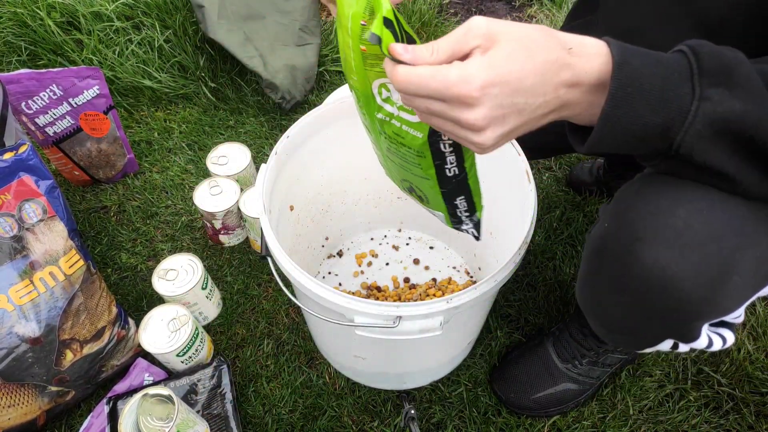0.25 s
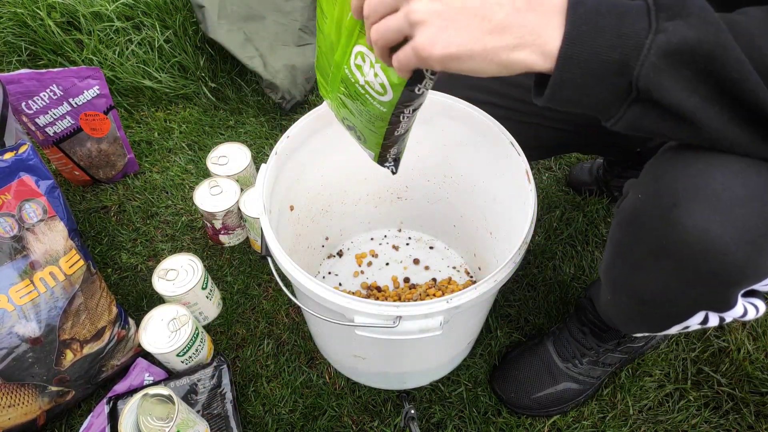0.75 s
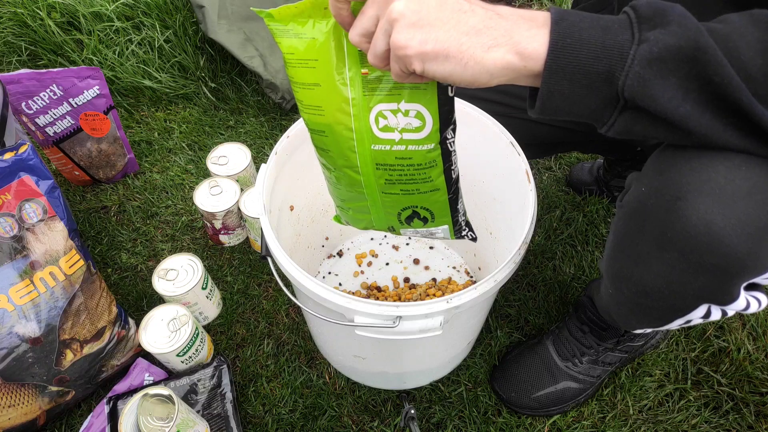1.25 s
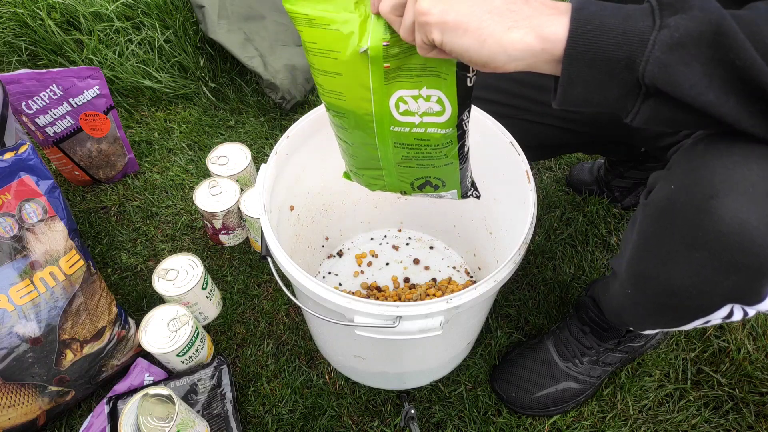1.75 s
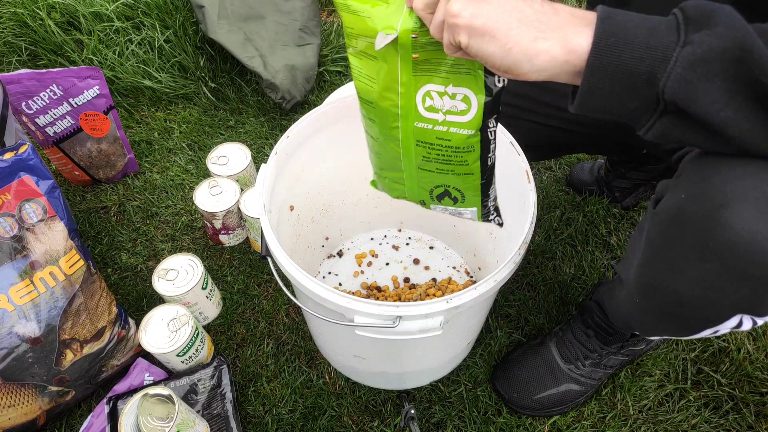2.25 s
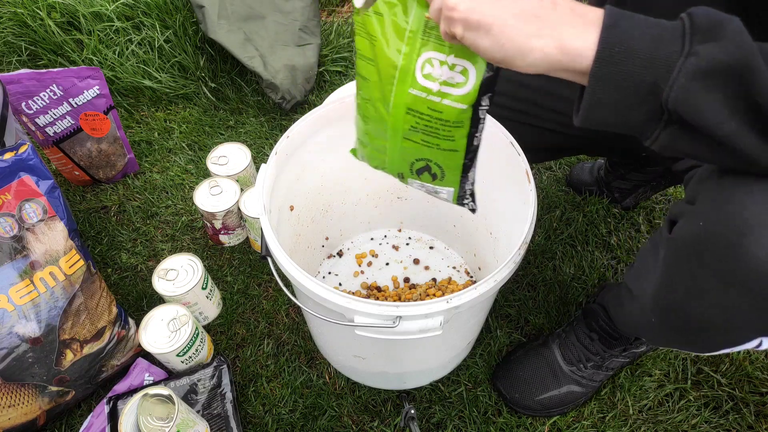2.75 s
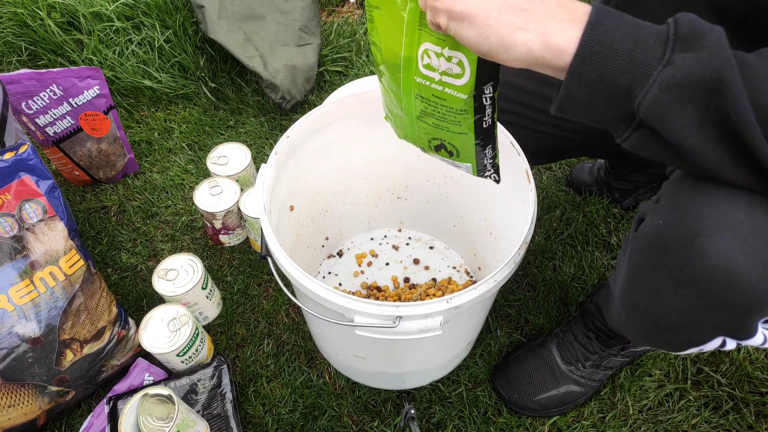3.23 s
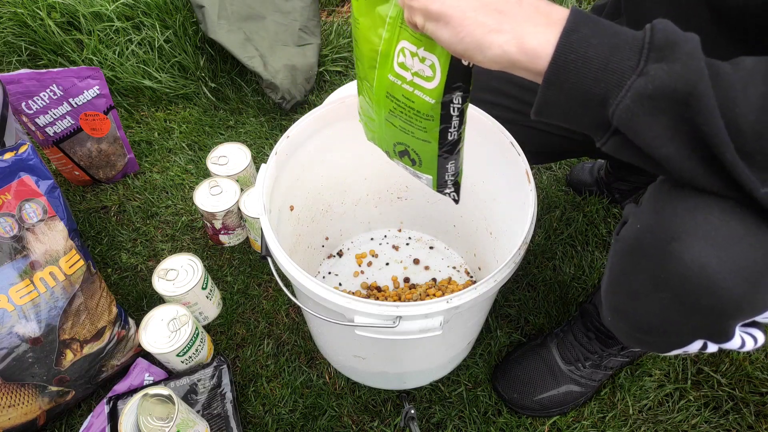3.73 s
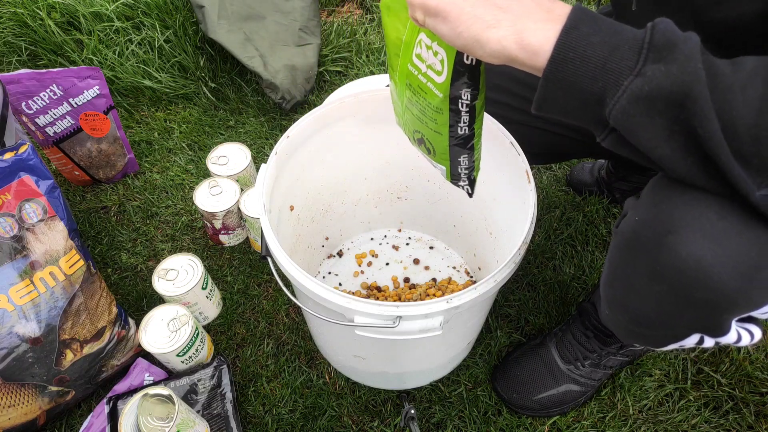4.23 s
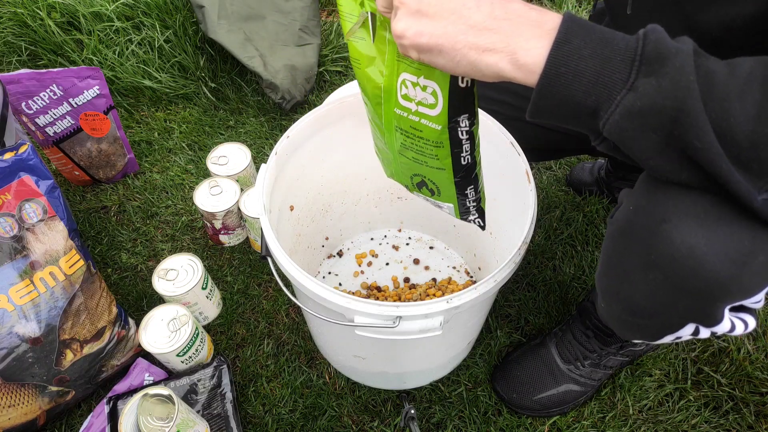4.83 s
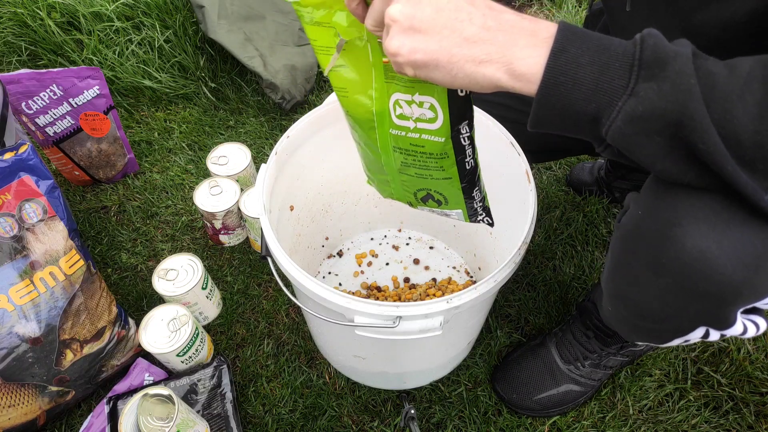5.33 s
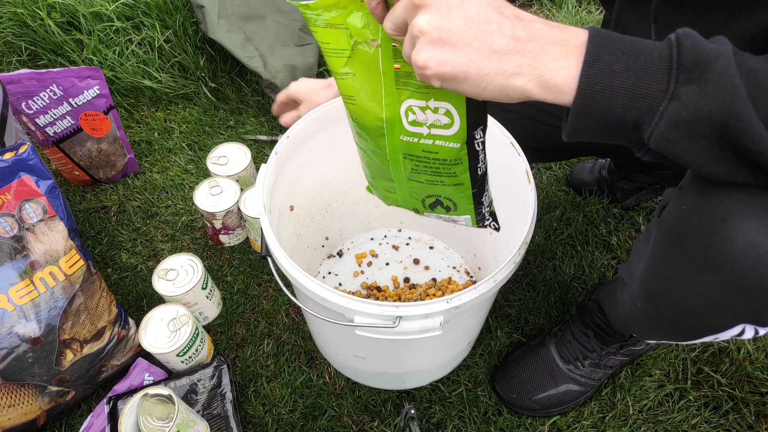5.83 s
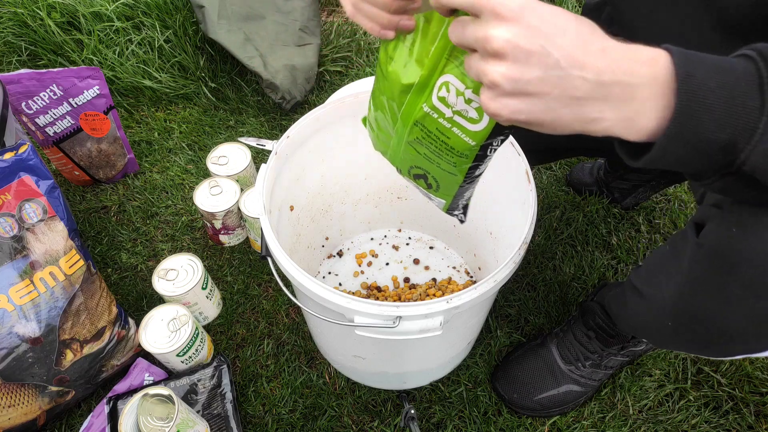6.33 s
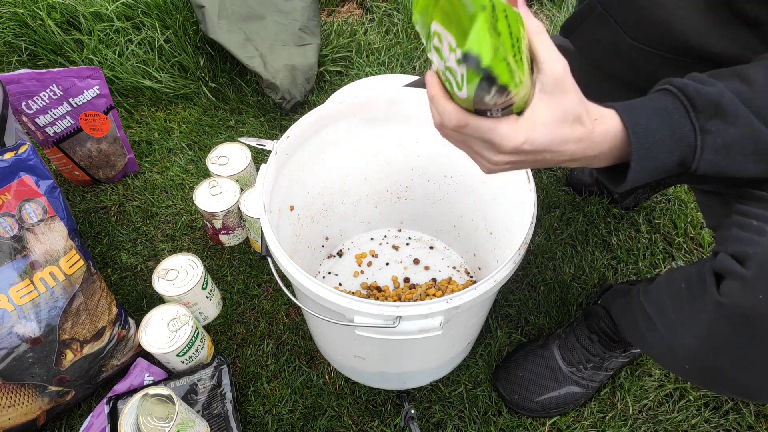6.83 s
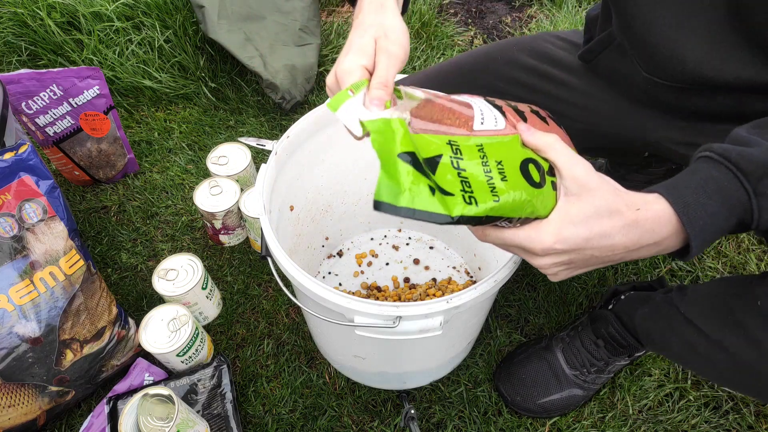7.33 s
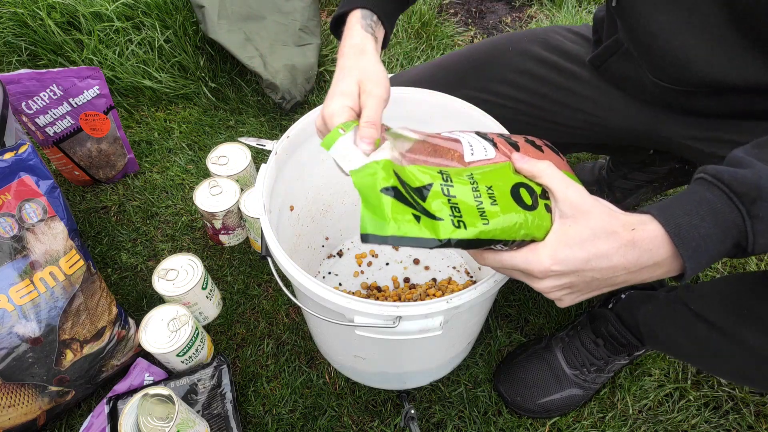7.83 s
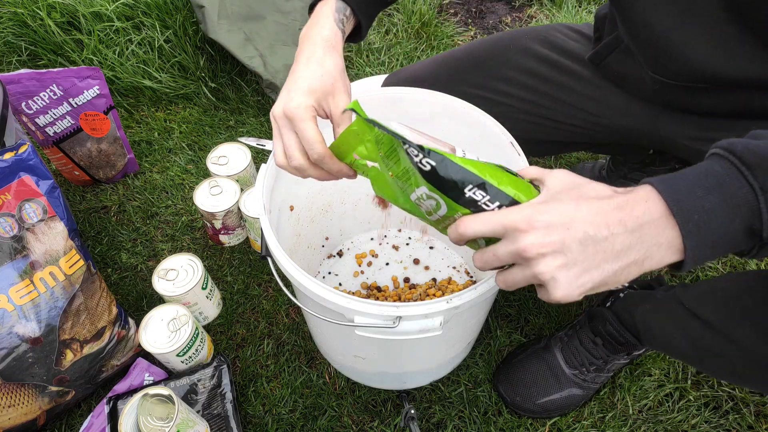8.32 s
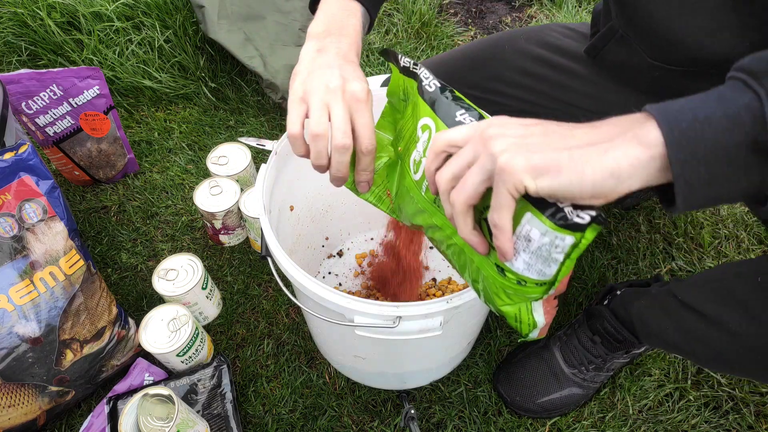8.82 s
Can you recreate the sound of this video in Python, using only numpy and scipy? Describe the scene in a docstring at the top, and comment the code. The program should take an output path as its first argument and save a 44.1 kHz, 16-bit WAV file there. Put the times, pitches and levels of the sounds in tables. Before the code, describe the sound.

Outdoors, close to the microphone, a stiff plastic bag of dry bait is handled over a plastic bucket. From 0.25 to 1 s it crackles densely with sharp snaps and small ringing pops. Lighter crinkling follows, then the strongest shakes come around 1.7-2.8 s, with hard cracks and low, soft thuds as the contents slump. From 3 to 5.3 s the crackle is quieter and more scattered, with muffled seed rattles. A near pause follows; at 5.9 s a tick makes the bucket ring briefly, followed by soft nudges. Small birds buzz and whistle from about 5.4 s, then trill and twitter, off to the right, until about 8 s. Film rustling resumes at 6.2 s. Crumbs slide audibly around 7 s and again from 8 s, ending in a fine, fizzy trickle to 9 s. Faint air and a swelling distant rumble continue throughout.

```python
"""A stiff plastic bag of dry groundbait is shaken down, opened and tipped over a plastic bucket, on grass outdoors.
The film makes single snaps, ringing pops and dense crackle, built from short pulses with noisy tails.
Bait slumps as bursts of low noise; something knocks the bucket in a pause, a tick with ringing tones.
Near the end fine crumbs pour as thousands of tiny clicks.
Small birds twitter in gliding whistles over the filtered noise of open air and a far rumble."""
import sys
import numpy as np
from scipy import signal
from scipy.fft import rfft, irfft, next_fast_len
from scipy.io import wavfile
from scipy.ndimage import uniform_filter1d

SR = 44100
rng = np.random.default_rng(int(sys.argv[2]) if len(sys.argv) > 2 else 0)


def unload_wav(signal):
    """Save mono or channel-first audio to the path in sys.argv[1] as 16-bit WAV at rate SR, clipped to [-1, 1]."""
    wavfile.write(
        sys.argv[1],
        SR,
        np.round(np.clip(np.atleast_2d(signal).T, -1, 1) * 32767).astype(np.int16),
    )


N = 399987
TIME = np.arange(N) / SR
TOP_HZ = 16000  # upper edge of the whole sound


def undb(db):
    """Turn decibels into a gain."""
    return 10 ** (np.asarray(db) / 20)


def unit(x):
    """Scale to an rms of 1."""
    return x / np.sqrt(np.mean(x ** 2) + 1e-20)


def fade(t, t60):
    """Die away by 60 dB in t60 seconds."""
    return np.exp(-np.log(1000) * t / t60)


def stereo_noise(size):
    """Two unrelated channels of white noise."""
    return rng.standard_normal((2, size))


def curves(table):
    """Read each column of a timed table, sample by sample."""
    s, *columns = np.transpose(table)
    return [np.interp(TIME, s, c) for c in columns]


def add(out, s, sound):
    """Mix a sound in at time s."""
    i = max(int(s * SR), 0)
    out[:, i:i + sound.shape[-1]] += sound[..., :max(N - i, 0)]


def walk(rate):
    """Slow chance: random levels, rate per second, joined by straight lines, with a spread near 1."""
    points = rng.standard_normal(4096)
    return 1.434 * np.interp(TIME * rate, np.arange(len(points)), points)


def response(points, size=2048):
    """Make a filter from an (f/Hz, level/dB) spectrum that never sounds ahead of its input."""
    hz, db = np.transpose(points)
    f = np.maximum(np.fft.rfftfreq(size, 1 / SR), 1)
    level_db = np.interp(np.log(f), np.log(hz), db)
    # folding the cepstrum forward gives minimum phase
    cepstrum = irfft(np.log(undb(level_db)))
    cepstrum[1:size // 2] *= 2
    cepstrum[size // 2 + 1:] = 0
    return irfft(np.exp(rfft(cepstrum)))


def colour(x, points, size=2048):
    """Filter a stereo sound with an (f/Hz, level/dB) spectrum."""
    return signal.fftconvolve(x, response(points, size=size)[None], axes=1)[:, :x.shape[1]]


def band(x, hz, kind, order=2):
    """Keep one range of frequencies (Butterworth filter)."""
    return signal.sosfilt(signal.butter(order, hz, kind, fs=SR, output="sos"), x)


def spread(pair, apart_hz, bass_side=0.16):
    """Make left and right nearly alike in the bass and unrelated in the treble, as in a wide sound."""
    mid, side = pair
    size = next_fast_len(len(side), True)
    treble = (np.fft.rfftfreq(size, 1 / SR) / apart_hz) ** 4
    side_gain = np.sqrt((bass_side ** 2 + treble) / (1 + treble))
    side = irfft(rfft(side, size) * side_gain, size)[:len(mid)]
    return np.array([mid + side, mid - side])


def registers(x, body_hz=700, crisp_hz=2500):
    """Split a film sound into dull body, middle and crisp top."""
    body = band(x, body_hz, "low", order=4)
    middle = band(x, [body_hz, crisp_hz], "band", order=3)
    top = band(x, crisp_hz, "high", order=3)
    return [body, middle, top]


# colour of the open air: f/Hz, level/dB
AIR_COLOUR = [(20, -1.5), (38, -9.5), (54, -3), (72, -2), (120, -8), (230, -21), (330, -16.5), (480, -16.5),
              (800, -25.5), (1600, -31), (4500, -32), (7400, -38), (8700, -44), (14200, -39), (16000, -95)]
# a far rumble that swells and sinks: t/s, level/dB (it wavers around this)
RUMBLE_LEVEL = [(0, -59.5), (1.2, -54), (3.0, -49.5), (3.44, -51.5), (3.48, -50), (3.54, -55), (4.2, -56.5),
                (4.8, -52.5), (5.3, -49), (5.8, -56), (6.6, -57), (7.1, -50.5), (7.6, -46), (7.75, -48.5),
                (7.95, -47), (8.2, -53), (8.6, -57), (8.83, -46), (9.07, -60)]
# colour of the rumble: f/Hz, level/dB
RUMBLE_COLOUR = [(90, -29.5), (150, -5.5), (205, 1), (260, -5.5), (330, -18.5), (450, -11.5), (800, -53.5)]


def outdoors(air_db=-53.5, breeze_db=-61, hum_db=-60, hum_hz=54, hum_drift_hz=2, waver_db=1.5):
    """Open air, a light breeze and a far rumble are filtered noise; a faint low hum is a drifting tone."""
    air = unit(colour(spread(stereo_noise(N), apart_hz=2120, bass_side=0.69), AIR_COLOUR, size=8192))
    breeze = unit(band(stereo_noise(N), 44, "low"))
    hum_phase = 2 * np.pi * np.cumsum(hum_hz + hum_drift_hz * walk(6.7)) / SR
    hum = unit(np.sin(hum_phase) * undb(2 * walk(2.4)))
    rumble = unit(colour(spread(stereo_noise(N), apart_hz=2520, bass_side=0.12), RUMBLE_COLOUR))
    rumble_db = curves(RUMBLE_LEVEL)[0] + waver_db * walk(8.1)
    return undb(air_db) * air + undb(breeze_db) * breeze + undb(hum_db) * hum + undb(rumble_db) * rumble


# colour of one buckle of the film: f/Hz, level/dB
FILM_COLOUR = [(60, -23), (150, -22.5), (270, 0.5), (390, 2), (500, -3.5), (750, -4), (1100, -1.5),
               (2000, -1.5), (3200, -0.5), (7300, 2.5), (8600, -10), (14200, -14), (16000, -51)]


def buckle(flutter_db, flutter_t60, facet_db, uneven_db=4.0, sides_db=3, lowest_hz=850,
           facet_octaves=3.24, echo_db=-14.02, echo_t60=0.034, echo_hz=1800, size=2048):
    """One facet of film flips: a sharp pulse with its own pitch, a flutter and dull echoes in the bucket."""
    t = np.arange(size) / SR
    hz = np.geomspace(200, 16000, 22)
    # broad facets pop low, tiny ones tick high
    octaves_off = np.log2(hz / lowest_hz) - facet_octaves * rng.random()
    facet = facet_db * np.exp(-octaves_off ** 2) + uneven_db * rng.standard_normal(len(hz))
    # samples between left and right; every crease lies elsewhere
    lag = 1.84 + 1.53 * rng.standard_normal()
    pulse = np.array([np.sinc(np.arange(size) - 10 - d) for d in (lag / 2, -lag / 2)])
    flutter = unit(spread(stereo_noise(size), apart_hz=3400) * fade(t, flutter_t60))
    echoes = spread(stereo_noise(size), apart_hz=3400) * fade(t, echo_t60)
    echoes = unit(band(echoes, echo_hz, "low"))
    # dividing by sqrt(size) sets each tail's energy against that of the pulse
    flip = pulse + (undb(flutter_db) * flutter + undb(echo_db) * echoes) / np.sqrt(size)
    # short waves beam, so each side hears its own treble
    beams = sides_db * rng.standard_normal((2, len(hz))) * np.minimum(hz / 4000, 1)
    own = [np.convolve(f, response(np.c_[hz, facet + b], size=256))[:size] for f, b in zip(flip, beams)]
    return colour(np.array(own), FILM_COLOUR)


def swarm(rate, sizes, facets):
    """Scatter buckles at random moments; rate is buckles per second, one number or one per sample."""
    out = np.zeros((2, N))
    which = rng.integers(0, len(facets), N)
    for i in np.flatnonzero(rng.random(N) < rate / SR):
        add(out, i / SR, sizes[i] * facets[which[i]])
    return out


# light crackle of the bag as it hangs in the hands: t/s, level/dB
HOLDING = [(0, -73), (.24, -81), (.27, -50.5), (1.1, -55), (1.22, -60), (1.48, -66.5), (1.56, -48),
           (2.9, -53.5), (3.45, -52), (3.62, -58.5), (3.92, -60), (4.3, -52.5), (4.75, -54.5), (5.33, -50),
           (5.48, -71.5), (6.16, -105), (6.2, -53), (6.56, -52), (6.63, -69), (6.95, -50.5), (7.5, -57.5),
           (7.7, -61), (7.86, -63.5), (7.96, -53), (8.15, -55.5), (8.55, -56), (9.07, -58.5)]
# each shake or squeeze sets off a burst of crackle:
# t/s, length/s, level/dB (at its end), crisp top/dB (against the middle)
SQUEEZES = [(0.25, 0.1, -42, -6), (0.428, 0.058, -36, 2), (0.689, 0.07, -34.5, 1),
            (0.828, 0.074, -38.5, -11), (0.909, 0.087, -36, 2.5), (1.013, 0.079, -41.5, -1.5),
            (1.555, 0.027, -37.5, -6), (1.7, 0.081, -43.5, -4), (1.819, 0.049, -43, -10),
            (1.955, 0.062, -42, -2), (2.082, 0.13, -39.5, -5.5), (2.27, 0.19, -39, -5),
            (2.367, 0.035, -25.5, -1.5), (2.43, 0.031, -32.5, -0.5), (2.453, 0.049, -30.5, 3),
            (2.504, 0.152, -38.5, -4), (2.679, 0.089, -32.5, 1.5), (2.774, .1, -40.5, -3),
            (2.943, 0.12, -44.5, -6), (3.105, 0.035, -43, -6), (3.21, 0.11, -45.5, -7),
            (3.354, 0.059, -41.5, -2), (3.726, 0.096, -44.5, -4), (4.176, 0.05, -52.5, 9.5),
            (4.4, 0.035, -42.5, 0.5), (4.491, 0.017, -42.5, 2), (4.677, 0.15, -45.5, -4),
            (4.808, 0.1, -47.5, -2), (5.106, 0.023, -40.5, -2), (5.165, 0.026, -41.5, -1.5),
            (5.251, 0.038, -37, -1.5), (6.19, 0.034, -46, 2), (6.216, 0.029, -37, -2),
            (6.27, 0.048, -46, 1), (6.401, 0.044, -46, -5), (6.506, 0.077, -42, -2),
            (6.994, 0.04, -41.5, -0.5), (7.091, 0.1, -53.5, -4), (7.447, 0.05, -48.5, 3),
            (7.971, 0.091, -50, 1), (8.076, 0.03, -40.5, -7), (8.74, 0.078, -48.5, -1)]


def effort(attack_s=.009, release_s=.018, ease_db=3):
    """How hard the film is worked and how crisp it sounds (dB): squeezes rise, ease and let go."""
    middle = undb(curves(HOLDING)[0]) ** 2
    top = middle.copy()
    for s, length, db, crisp in SQUEEZES:
        on = slice(int(s * SR), int((s + length + 10 * release_s) * SR))
        t = np.arange(len(TIME[on])) / SR
        shape = (1 - np.exp(-t / attack_s)) * np.exp(-np.maximum(t - length, 0) / release_s)
        # the target level starts ease_db higher and sinks during the squeeze
        burst = shape * undb(db + ease_db * (1 - np.minimum(t / length, 1)))
        middle[on] += burst ** 2
        top[on] += (burst * undb(crisp)) ** 2
    return 10 * np.log10(middle), 10 * np.log10(top / middle)


def crackle(rate=190, rate_per_db=0.08, size_db=5.0, rub_db=-26, body_db=-4, count=60):
    """Swarms of small buckles, denser under a harder grip, over the hiss of bait rubbing along the film."""
    db, crisp = effort()
    per_second = rate * np.exp(rate_per_db * (db - np.median(db)))
    sizes = undb(size_db * np.minimum(rng.exponential(size=N), 4)) * rng.choice([-1, 1], N)
    facets = [unit(buckle(flutter_db=5, flutter_t60=0.037, facet_db=11.5)) for _ in range(count)]
    rub = unit(colour(spread(stereo_noise(N), apart_hz=3280), FILM_COLOUR))
    film = unit(swarm(per_second, sizes, facets)) + undb(rub_db) * rub
    heard = 0
    for part, level in zip(registers(film), (db + body_db, db, db + crisp)):
        # the hands' work is shared out among the creases that give way at that moment
        power = uniform_filter1d(np.mean(part ** 2, axis=0), size=2200)
        heard = heard + part * undb(level) / np.sqrt(np.maximum(power, 1e-9))
    return heard


def rattle(rate=110, under_hold_db=-6, size_db=3.5, muffle_hz=2100, count=16):
    """Seeds shift inside the hanging bag and tap the film: a swarm of soft, low, muffled pops."""
    sizes = undb(size_db * np.minimum(rng.exponential(size=N), 3))
    taps = [unit(buckle(flutter_db=0, flutter_t60=0.02, facet_db=22, lowest_hz=650, facet_octaves=1.4))
            for _ in range(count)]
    muffled = unit(band(swarm(rate, sizes, taps), muffle_hz, "low"))
    return muffled * undb(curves(HOLDING)[0] + under_hold_db)


def crease(pop_hz, flutter_db=1.0, slack_db=3, slip_db=-9, slip_s=.007):
    """A crease gives way, taut or slack, and slips once more a moment later with its sides swapped."""
    first = buckle(flutter_db=flutter_db + slack_db * rng.standard_normal(), flutter_t60=0.017,
                   facet_db=7.0, uneven_db=3.0, lowest_hz=pop_hz, facet_octaves=0)
    lag = int(SR * slip_s * (.2 + rng.random()))
    return first + undb(slip_db) * np.roll(first[::-1], lag, axis=1)


# the loudest creases that buckle singly:
# t/s, level/dB (of the middle), crisp top/dB (against the middle), left minus right/dB (of the top)
SNAPS = [(.262, -33, -1.5, 4), (.282, -35, -2.5, 0), (.294, -41, 9, 2), (0.312, -39, 9.5, -4),
         (0.344, -42.5, 9.5, -2), (0.369, -33, -3, -2.5), (.407, -48, 10, -1), (.418, -34, -1.5, 1),
         (.449, -39.5, 9.5, -3), (0.5239, -40, 9.5, 1), (0.5554, -34.5, 0, -2), (0.61, -30.5, 1, 1),
         (0.6205, -33.5, -0.5, -13), (.637, -43, 8, -3), (0.6756, -30.5, 1.5, -1), (0.685, -29, -1.5, -3),
         (.719, -25.5, -10, -2), (0.8124, -33, -3.5, 3), (.837, -33, -6, -1), (0.859, -34.5, 6.5, -1),
         (.882, -35.5, 2, -10), (0.889, -35, 2, 5), (.919, -29.5, -3, -4), (.953, -36, 6.5, 1),
         (0.968, -39.5, 12, -1), (0.9786, -37, 0, -2), (.991, -37.5, 9.5, 0), (1.013, -28, -1, 1),
         (1.126, -39.5, -12, -1), (1.1693, -36, -11.5, -4), (1.268, -40.5, -21, -4),
         (1.2796, -38.5, -10, 1), (1.4082, -38.5, -14, -4), (1.433, -44, -11, 0), (1.5102, -45, 1.5, 0),
         (1.523, -35.5, -7, -1), (1.5469, -32, 7, -1), (1.554, -33.5, 5, 0), (1.6145, -48, 3, -7),
         (1.6227, -38, 1, -2), (1.698, -34.5, -1.5, 2), (1.7233, -36, 0.5, 24.5), (1.7302, -27, -2.5, -11),
         (1.759, -19, -4.5, 3), (1.7709, -23.5, -1.5, -2), (1.781, -34, -2, 0), (1.8002, -24, -2.5, -1),
         (1.8048, -45, 7.5, -7), (1.845, -41, 5.5, -2), (1.9098, -30, 0, 0), (1.95, -37, -9, -4.5),
         (2.0417, -46, 4, 1), (2.087, -32.5, 1.5, 0), (2.127, -36.5, 9, 0), (2.143, -32, -3, -2),
         (2.1689, -24.5, -3, 0), (2.1906, -34.5, 7.5, 0.5), (2.243, -37, -0.5, 1), (2.291, -33, -3, -2),
         (2.314, -41, -3, -3), (2.34, -36, -4, 0), (2.407, -22.5, 1.5, -3), (2.461, -23.5, -1, 4.5),
         (2.4951, -32, 8, 0), (2.523, -33, -2, 0), (2.543, -34, -1, 0), (2.6189, -31.5, -2.5, 0),
         (2.6748, -22.5, -2.5, 0.5), (2.7063, -29.5, 9.5, 0.5), (2.731, -38, 12, 0), (2.759, -33.5, 9.5, 0),
         (2.803, -38.5, 8.5, -1), (2.989, -37, -2.5, -1), (3.012, -39.5, 6.5, 2), (3.049, -38, 4.5, -2),
         (3.09, -44, 7, -2), (3.177, -40.5, -2, -5), (3.227, -39, -7, -1), (3.291, -45.5, 7, -4),
         (3.3718, -33.5, 2.5, -1), (3.395, -37, -7, -4), (3.5137, -29.5, 4.5, -5.5), (3.603, -52, 4, -4),
         (3.644, -41.5, -8.5, -4), (3.71, -39, -2, -4), (3.7498, -40.5, 2, -1), (3.792, -46, 9.5, 0),
         (3.807, -36, 1, 0), (3.8429, -40, 4.5, -1), (3.959, -46, 2, -1), (3.969, -41.5, -15, 1),
         (3.98, -45, 5.5, -12), (4.0318, -36.5, -8, -1), (4.065, -47.5, 3.5, -2), (4.1086, -37.5, -5, 2),
         (4.187, -44.5, 1, 2), (4.221, -37.5, 0.5, -2), (4.231, -34.5, -12, -2), (4.245, -43, -6, 0),
         (4.288, -42.5, 5.5, -1), (4.321, -43.5, -9, 0), (4.424, -44, 4, -5), (4.434, -52, 8, 4),
         (4.46, -37, -4.5, -3), (4.5006, -41, -0.5, -3), (4.508, -57, 12, -3), (4.5699, -38.5, 8.5, -2),
         (4.5982, -34, 1, -2), (4.653, -48.5, 2, 1), (4.685, -36, 1.5, -2.5), (4.71, -35, 0.5, -4),
         (4.7575, -34, 0.5, -3), (4.773, -42, -8, -1), (4.822, -36.5, 0, -5), (4.89, -38.5, -14, -2),
         (4.904, -48, 3, -2), (4.996, -39, -24, -4), (5.027, -32.5, -5, 0), (5.1, -32, 1.5, -4),
         (5.1323, -43.5, 15, -1), (5.186, -46, -11, 2), (5.204, -34.5, 1.5, -2), (5.268, -51, 11.5, -2),
         (5.289, -29.5, 0, -3), (5.302, -36, 3.5, 3), (5.444, -44.5, 0.5, 0), (6.225, -32.5, 1.5, -3),
         (6.243, -36, 7.5, 2), (6.286, -53, 18, -4), (6.304, -30, -1, -8), (6.373, -48, -10, -1),
         (6.5327, -30.5, 1.5, -3.5), (6.561, -45.5, 9, -5), (6.604, -49, 7, 5), (6.644, -39.5, 2, -5),
         (6.9, -44.5, 3, -4), (6.923, -45.5, 0, 5), (6.931, -39.5, -2, -2), (7.004, -40.5, 6, -2),
         (7.013, -41, -2, 0), (7.021, -44, -2, 0), (7.0505, -40, 0.5, 3), (7.153, -40, 7.5, 0),
         (7.2337, -36, -1, 2), (7.239, -39, 6, 2), (7.325, -45, 8, 1), (7.417, -44.5, 5.5, 0),
         (7.44, -38.5, 0, -2), (7.4692, -34, -1, -2), (7.492, -42.5, 6, 0), (7.598, -33.5, 7, -1),
         (7.609, -36, 5, 14), (7.6418, -36, 4, 4), (7.6723, -43, 1, -1), (7.7877, -48, 8.5, 2),
         (7.9615, -27.5, 5, 2), (8.0471, -42, 1, 5), (8.085, -47.5, 8, 7), (8.095, -42.5, 12.5, -2),
         (8.111, -37, 2, 3), (8.1532, -44.5, 7.5, 0), (8.179, -45.5, 6, -1), (8.225, -39, 3.5, 0),
         (8.244, -52, 6, 3), (8.378, -36, -9, -2), (8.4466, -46, -4, 0), (8.501, -48, 0, -1),
         (8.523, -47, 1, 0), (8.599, -45.5, 4.5, 1), (8.639, -42, -6, -1), (8.693, -46.5, -5, -6),
         (8.754, -31, 1.5, 4.5), (8.7587, -39.5, 8.5, -5), (8.8162, -44, -2, -2), (8.839, -40, 5.5, .5),
         (8.9159, -38.5, -2.5, -8)]


def snaps(middle_pop_hz=1470, crisp_db_per_octave=3.5, body_db=-14, body_lean=0.51, middle_lean=0.26):
    """Loud single buckles: the crisper a snap, the smaller its facet and the higher it pops."""
    out = np.zeros((2, N))
    span = .008 * SR  # a level counts all the energy as if it fell within 8 ms
    for s, db, crisp, pan in SNAPS:
        pop_hz = middle_pop_hz * 2 ** (crisp / crisp_db_per_octave)
        parts = registers(crease(pop_hz))
        levels = (db + body_db, db, db + crisp)
        # body and middle lean less to one side than the top
        for part, level, lean in zip(parts, levels, (body_lean, middle_lean, 1)):
            gain = undb(level + lean * np.array([[pan], [-pan]]) / 2)
            even = part * np.sqrt(span / np.sum(part ** 2, axis=1, keepdims=True))
            add(out, s - .0003, gain * even)
    return out


# the bait slumps against the bag: t/s, level/dB (rms of the first 15 ms), decay t60/s
SLUMPS = [(0.446, -35, 0.059), (0.718, -38, 0.078), (1.012, -41, 0.035), (1.727, -21.5, 0.049),
          (1.758, -29.5, 0.11), (2.169, -32, 0.045), (2.377, -23.5, 0.11), (2.401, -22, 0.042),
          (2.482, -34.5, 0.31), (2.71, -30.5, 0.12), (3.513, -33, 0.025), (5.301, -33.5, 0.027)]
# colour of a slump: f/Hz, level/dB
SLUMP_COLOUR = [(55, -12), (90, -1.5), (140, 2), (200, -1.5), (370, 8), (520, -1.5), (800, 1.5), (1200, 2),
                (2000, -29)]


def slumps(size=8192):
    """The mass of bait drops into a corner of the bag: a soft, low thud of fading noise."""
    out, t = np.zeros((2, N)), np.arange(size) / SR
    for s, db, t60 in SLUMPS:
        grains = spread(stereo_noise(size), apart_hz=4000)
        thud = colour(grains * fade(t, t60), SLUMP_COLOUR)
        add(out, s, undb(db) * thud / np.sqrt(np.mean(thud[:, t < .015] ** 2)))
    return out


# a taut panel of the bag pops over and rings for a few cycles:
# t/s, pitch f/Hz, level/dB (of the ring), t60/s, crease tick/dB (against the ring)
POPS = [(.741, 1960, -27.5, .02, -10), (1.035, 1270, -31.5, .022, -6), (1.063, 1390, -30.5, .018, -4),
        (1.675, 870, -36.5, .02, -12), (1.7095, 890, -35, .012, -11.5), (1.7277, 780, -18.5, .011, -9),
        (2.479, 1040, -22, .005, -10), (2.8185, 2060, -39, .016, -9), (2.8546, 1770, -30.5, .014, -11),
        (2.968, 1120, -36.5, .02, -5), (3.5586, 800, -37.5, .016, -2), (3.997, 950, -39.5, .02, -3.5),
        (4.853, 980, -42, .018, -9), (6.336, 2030, -34, .02, -4), (7.04, 1320, -36, .02, -5)]


def pops(overtone_ratio=1.42, overtone_db=-7, size=2048):
    """Each panel flips with a tick and rings in two short modes."""
    out, t = np.zeros((2, N)), np.arange(size) / SR
    span = .008 * SR  # a level counts all the energy as if it fell within 8 ms
    for s, hz, db, t60, tick_db in POPS:
        phase = 2 * np.pi * hz * t
        modes = np.sin(phase) + undb(overtone_db) * np.sin(overtone_ratio * phase)
        ring = unit(modes * fade(t, t60))
        tick = unit(buckle(flutter_db=1.0, flutter_t60=0.022, facet_db=0))
        add(out, s - .0003, undb(db) * (ring + undb(tick_db) * tick) * np.sqrt(span / size))
    return out


# knocks and nudges on the bucket: t/s, relative level/dB, hard tick/dB (relative), contact time/s
KNOCKS = [(5.302, -37, -2, 0.00013), (5.9192, -14, -8, 0.000046), (5.978, -32, -18, 0.007),
          (6.048, -41.5, -28, 0.019), (6.072, -35.5, -18, 0.015)]
# ringing tones of the bucket wall: f/Hz, level/dB, t60/s
BUCKET_MODES = [(264, -19, .09), (350, -15, .025), (474, -10, .063), (560, -7, .03), (690, -13, .03),
                (781, -6, .033), (926, -14, .04), (1254, -22, .025), (1560, -21, .028), (1850, -19, .017),
                (2191, -20, .024), (2720, -20, .012)]


def knocks(wall_low_hz=330, tick_decay_s=0.0033, size=8192):
    """A tap ticks and the bucket wall rings briefly; a soft nudge drags and mostly stirs the wall."""
    out, t = np.zeros((2, N)), np.arange(size) / SR
    ring = np.zeros(size)
    for k, (hz, db, t60) in enumerate(BUCKET_MODES):
        # neighbouring modes swing in opposite directions
        ring += (-1) ** k * undb(db) * np.sin(2 * np.pi * hz * t) * fade(t, t60)
    for s, db, tick_db, contact in KNOCKS:
        rough_push = np.exp(-t / contact) * rng.exponential(size=size) ** 2
        # the small wall radiates little of the bass
        wall = band(signal.fftconvolve(rough_push, ring)[:size], wall_low_hz, "high")
        wall *= np.std(ring) / np.std(wall)
        tick = spread(stereo_noise(size), apart_hz=2970) * np.exp(-t / tick_decay_s)
        add(out, s, undb(db) * (undb(tick_db) * colour(tick, FILM_COLOUR) - wall))
    return out


# runs of one syllable: start t/s, syllable, repeats, period/s, first level/dB, growth per repeat/dB
SONG = [(5.43, "thin", 2, .26, -63, -3), (5.66, "pipe", 1, .012, -56.5, 0), (5.503, "fall", 1, .16, -59, 0),
        (5.616, "buzz", 4, .158, -54, 2), (5.665, "rise", 4, .16, -53.5, 1.2),
        (5.682, "fall", 4, .161, -50, 1), (5.706, "flick", 4, .158, -56, 2),
        (6.378, "trill", 7, .035, -46, 0), (6.687, "twitter", 2, .143, -43, 2.5),
        (7.116, "twitter", 2, .143, -45.5, 0), (7.44, "slur", 2, .152, -47, 2),
        (7.563, "fall", 1, .16, -45, 0), (7.73, "far", 1, .16, -58, 0), (7.718, "chip", 2, .077, -42, .5)]


def syllables():
    """List every note of the song as (t/s, syllable, level/dB)."""
    notes = []
    for s, name, repeats, period, db, growth in SONG:
        for k in range(round(repeats)):
            notes.append((s + k * period, name, db + k * growth))
    return notes


# central pitch path of each named bird syllable: t/s (from its start), f/Hz
SYLLABLES = { "buzz": [(0, 6150), (.032, 5850)], "rise": [(0, 3930), (.006, 4500), (.011, 4750),
             (.018, 4470), (.028, 4150)], "fall": [(0, 7300), (.004, 6050), (.009, 5300), (.015, 5000)],
             "flick": [(0, 5340), (.013, 4700)], "trill": [(0, 4570), (.01, 3400), (.024, 2840)],
             "twitter": [(0, 4300), (.01, 6000), (.013, 4460), (.022, 4600), (.036, 3280), (.044, 3600),
             (.054, 3550), (.08, 2700)], "slur": [(0, 2500), (.025, 2250), (.05, 2600), (.065, 3300),
             (.08, 2900)], "chip": [(0, 4580), (.008, 6600), (.016, 7300), (.021, 5300), (.027, 6200),
             (.032, 4930), (.042, 5300)], "pipe": [(0, 2720), (.02, 2780), (.085, 2830)], "far": [(0, 3600),
             (.16, 3490)], "thin": [(0, 4570), (.22, 4660)]}


def birds(buzz_hz=210, buzz_depth_hz=680, flicker_db=2, trees_db=-7, trees_t60=0.16,
          left_late_s=0.00013, size=16384):
    """Near-pure whistles run through quick syllables, off to the right; foliage scatters them."""
    out = np.zeros((2, N))
    late = np.array([[left_late_s], [0]])
    for s, name, db in syllables():
        at, hz = np.transpose(SYLLABLES[name])
        t = np.arange(int(at[-1] * SR)) / SR
        pitch = np.interp(t, at, hz) * (1 + 0.0115 * rng.standard_normal())
        if name == "buzz":
            pitch = pitch + buzz_depth_hz * np.sin(2 * np.pi * buzz_hz * t)
        swell = np.abs(np.sin(np.pi * t / at[-1])) ** 0.3
        whistle = np.sin(2 * np.pi * (np.cumsum(pitch) / SR - late * pitch))
        add(out, s, undb(db) * swell * whistle)
    out *= undb(flicker_db * walk(120))
    t = np.arange(size) / SR
    scatter = unit(stereo_noise(size) * fade(t, trees_t60)) / np.sqrt(size)
    return out + undb(trees_db) * signal.fftconvolve(out, scatter, axes=1)[:, :N]


# crumbs sliding in the tilted bag, then running out:
# t/s, level/dB (before the flow varies and dust is added), fizz of the finest dust/dB (added treble)
POUR = [(0, -120, -31.5), (6.6, -100, -19.5), (6.7, -54, 10.5), (6.9, -50.5, -4), (7.02, -37, -13),
        (7.1, -53, -15), (7.3, -54.5, -20), (7.5, -58, -30), (7.75, -64, -11), (7.92, -54.5, -15.5),
        (8.05, -47.5, -23), (8.3, -52.5, 6), (8.6, -62.5, 15), (8.85, -49, 11), (9.07, -58, 18)]
# colour of the crumbs: f/Hz, level/dB
POUR_COLOUR = [(200, -21), (500, 6), (1100, 4), (2500, 5.5), (7300, -3.5), (8800, -16.5), (14200, -21.5),
               (16000, -52)]


def pour(grains_per_khz=300, size_db=0.5, flow_db=3.2, fizz_hz=7500, patchy_db=2, patches_per_s=42, count=12):
    """Crumbs slide over the film and land in the bucket: a few coarse ones tick low, many fine ones high."""
    db, fizz_db = curves(POUR)
    edges = np.geomspace(350, TOP_HZ, count + 1)
    sizes = rng.choice([-1, 1], (2, N)) * undb(size_db * np.minimum(rng.exponential(size=(2, N)), 4))
    grains = 0
    for low, high in zip(edges, edges[1:]):
        per_second = grains_per_khz * (high - low) / 1000
        lands = rng.random((2, N)) < per_second / SR
        clumps = undb(patchy_db * walk(patches_per_s))  # crumbs of like size slide together
        grains = grains + clumps * band(unit(sizes * lands), [low, high], "band")
    crumbs = unit(colour(spread(grains, apart_hz=3000), POUR_COLOUR))
    # filtered forwards and backwards, so the dust stays in step with the crumbs
    dust = signal.sosfiltfilt(signal.butter(2, fizz_hz, "high", fs=SR, output="sos"), crumbs)
    return (crumbs + undb(fizz_db) * dust) * undb(db + flow_db * walk(35))


def scene():
    """Bag, bait and bucket close by; birds and rumble far off."""
    surroundings = outdoors() + birds()
    bag = crackle() + rattle() + snaps() + pops()
    bait_and_bucket = slumps() + knocks() + pour()
    return surroundings + bag + bait_and_bucket


def record(dry):
    """Clip at full scale, then cut the treble steeply above TOP_HZ."""
    low_pass = signal.ellip(8, .2, 70, TOP_HZ, fs=SR, output="sos")
    return signal.sosfilt(low_pass, np.clip(dry, -1, 1))


dry = scene()
out = record(dry)
unload_wav(out)
```